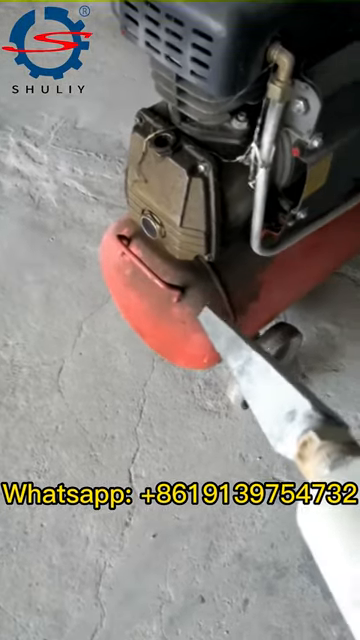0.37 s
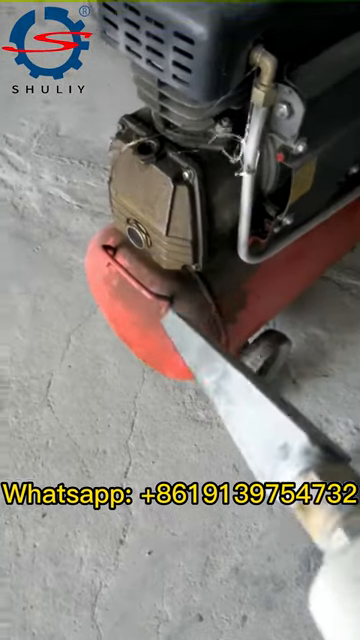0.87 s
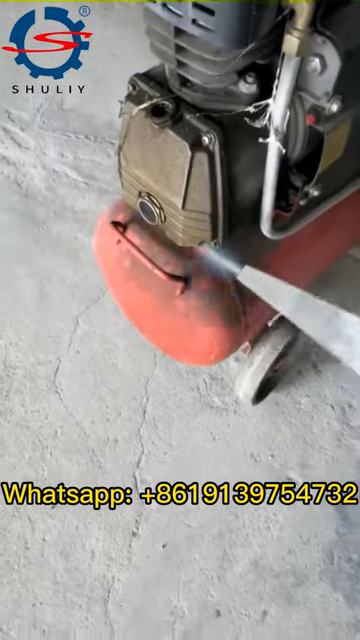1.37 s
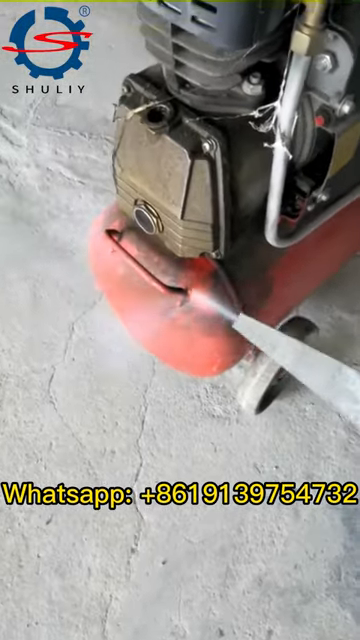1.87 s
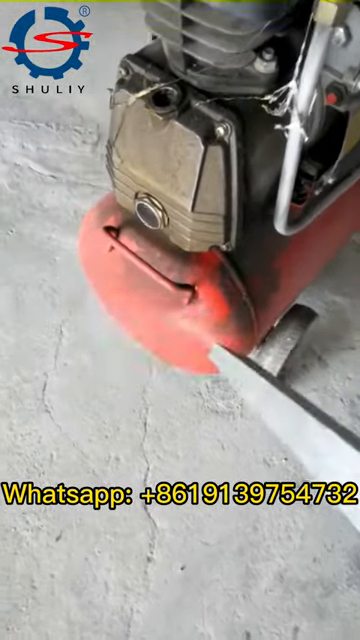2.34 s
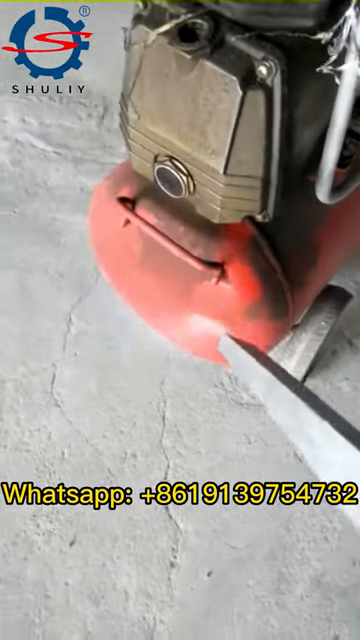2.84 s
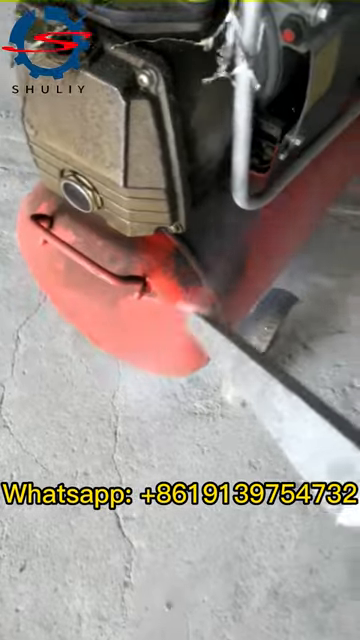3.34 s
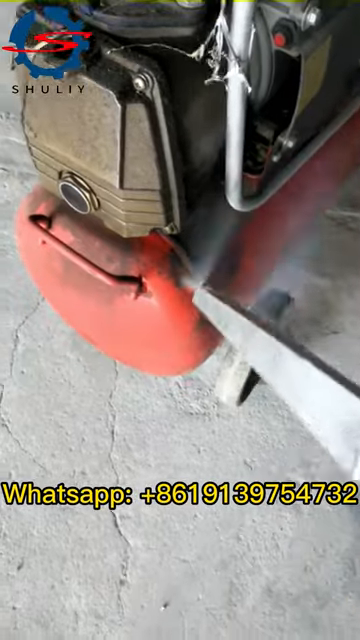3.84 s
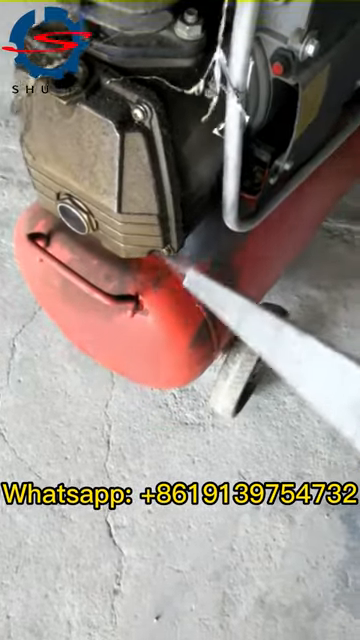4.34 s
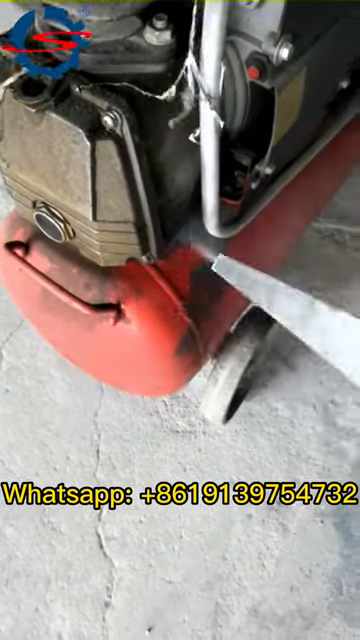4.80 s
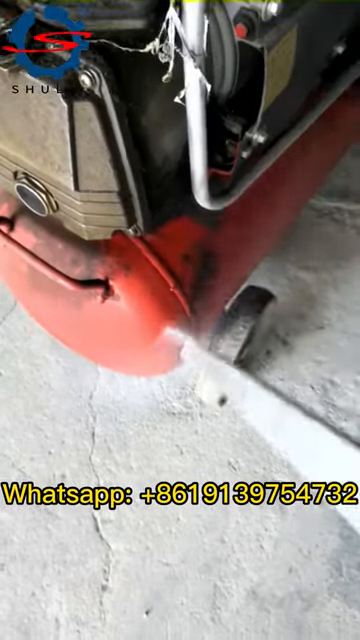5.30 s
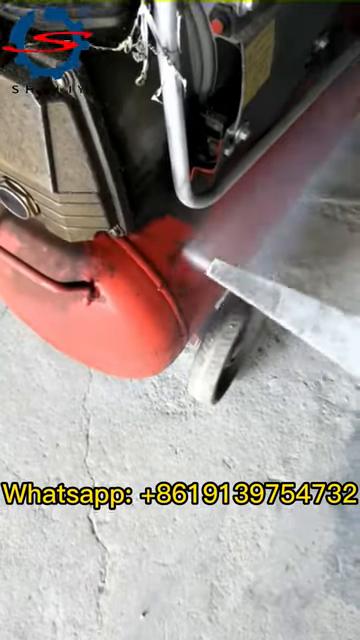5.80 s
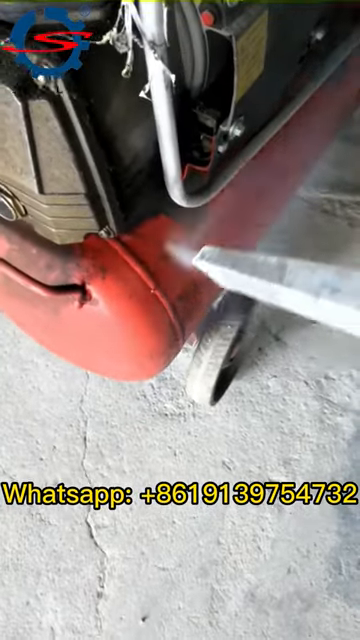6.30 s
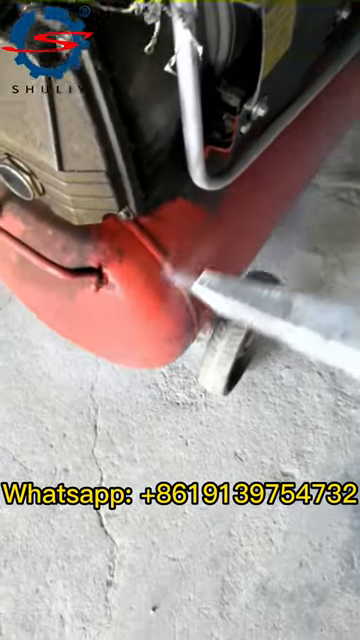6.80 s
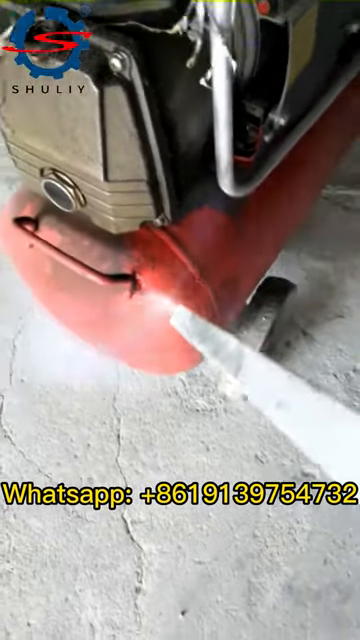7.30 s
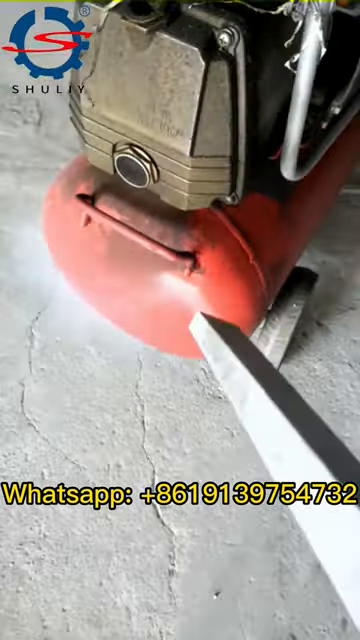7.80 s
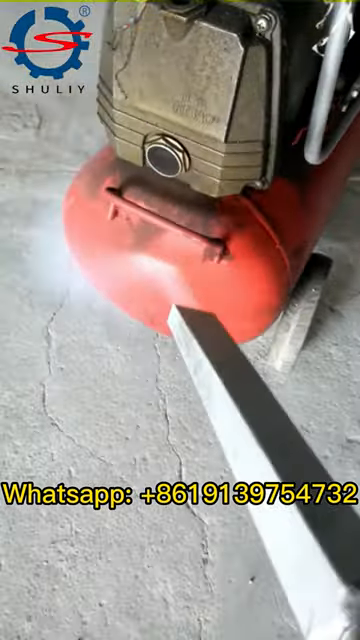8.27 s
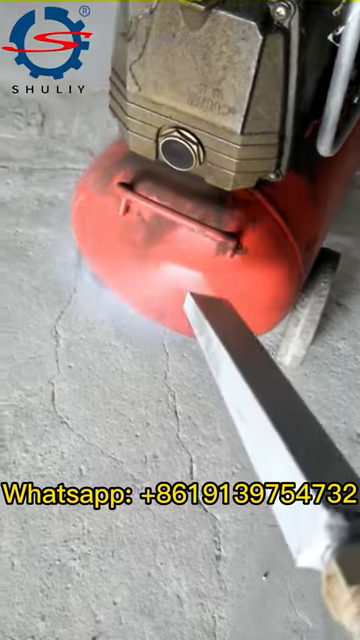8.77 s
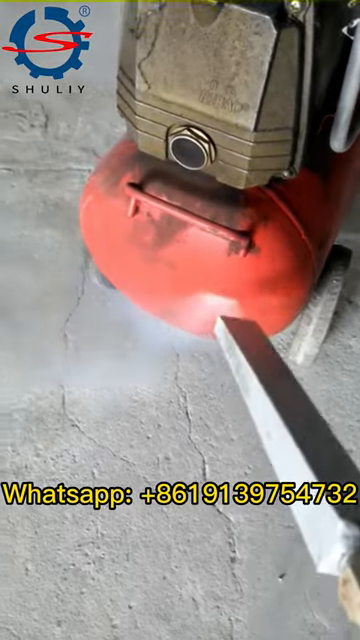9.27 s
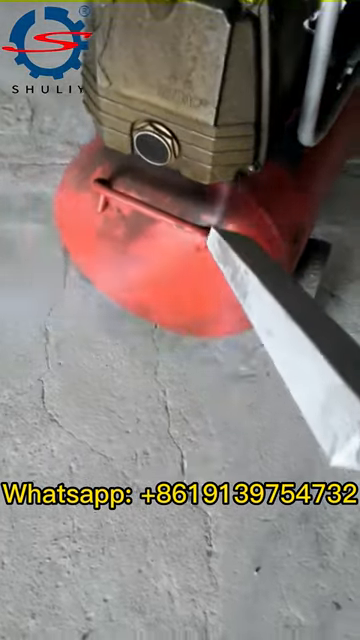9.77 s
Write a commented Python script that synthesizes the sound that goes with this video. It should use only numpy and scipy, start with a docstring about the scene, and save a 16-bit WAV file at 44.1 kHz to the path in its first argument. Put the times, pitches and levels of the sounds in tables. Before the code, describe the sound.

For the first 0.8 seconds a workshop is quiet: low room noise, faint machine drones and a thin, slightly wavering compressor whine, with small dry double ticks of hard parts at about 0.2, 0.35, 0.5 and 0.7. A soft mid-pitched hum swells from 0.65. At 0.78 the gun's trigger clicks sharply; around 0.81 a thin high whistle of air escapes, followed by low thumps, short spits and a hard valve knock at 0.85. By 0.9 the jet surges to full force and stays loud to the end near 10 seconds. It is a dense airy roar with bright, gritty ice hiss on steel and a weak buffeting rumble. From 1 to 2.9 it has a focused, ringing nozzle tone; later it is broader, its colour shifting with each sweep. The hiss dips briefly around 2.5, 6.6, 7.25 and several times from 7.6 to 8.8. Close, mono perspective.

```python
"""A quiet workshop, a mono microphone standing near: a compressor whines under room noise, hard parts tick.
A blast gun's trigger clicks as damped ringing modes; the valve thumps in low swings and spits bursts of noise.
Then a jet of air and dry ice roars against a steel tank: shaped noise for the roar, the hiss and the rumble,
with humps that move as the nozzle sweeps about."""
import sys
import numpy as np
from scipy import signal
from scipy.fft import rfft, irfft
from scipy.io import wavfile
from scipy.ndimage import uniform_filter1d

SR = 44100
rng = np.random.default_rng(int(sys.argv[2]) if len(sys.argv) > 2 else 0)


def natural_amplitude(level_db):
    """Convert a level in decibels to a linear amplitude factor, elementwise."""
    exponent = np.asarray(level_db, float) / 20
    return 10 ** exponent


def transcribe(u):
    """Save the signal u as a 16-bit wav file named by the first command-line argument.

    u: samples, shape (n,) or (channels, n), limited to [-1, 1]; the rate is SR.
    q: integer samples, one column per channel.
    """
    v = np.clip(np.atleast_2d(u).T, -1, 1)
    q = np.round(v * 32767).astype(np.int16)
    wavfile.write(sys.argv[1], SR, q)


N = 436149  # length in samples

# Room noise of the workshop. Each row: frequency in Hz, relative density in dB per Hz.
ROOM_SPECTRUM = [(12, -28), (20, -6), (53, 1), (308, -10), (398, -23), (602, -27), (1090, -24),
                 (1480, -23.5), (2180, -19), (3130, -27), (6970, -20), (8140, -28), (9500, -62),
                 (12400, -95), (20900, -120)]
# The idle workshop over time. Each row: time in seconds, room noise in dB, compressor whine in dB.
IDLE_LEVELS = [(0.0, -52, -75), (0.244, -51, -68), (0.52, -50, -64.5), (0.77, -49.5, -67)]
# Shaft orders of the compressor. Each row: multiple of the shaft rate, level relative to the whine in dB.
SHAFT_ORDERS = [(7, -8), (11, -27), (12, 0.5), (14, 8), (15, -5), (17, -14)]
# Low tones of the machines. Each row: frequency in Hz, rms level in dB, waver in dB.
MACHINE_DRONES = [(100, -65, 8), (148, -64, 9), (255, -65, 1), (305.2, -62, 1.5)]
# Ticks of small hard parts. Each row: start in seconds, peak of the first knock in dB, pitch in Hz,
# weight of the lower modes in dB, weight of the upper modes in dB.
TICK_EVENTS = [(.2109, -39, 2900, -5, -7), (.3631, -37.5, 2750, -5, -5), (.5292, -37, 2750, -9, -3),
               (.6898, -41, 2350, -10, 1), (.718, -45, 2750, -6, -6)]
# Modes of a ticking part. Each row: factor on the pitch, relative level in dB, 60 dB decay in seconds.
TICK_MODES = [(.62, -3, 0.017), (.71, 0, 0.017), (.82, -6, 0.011), (.95, 2, 0.016), (1.05, -7, .014),
              (1.2, -6, .01), (1.4, -16, .01), (1.75, -8, .008), (2.2, -6, 0.0073), (2.8, -5, 0.0088),
              (3.2, -15, .008)]
# The trigger strikes, then catches. Each row: start in seconds, peak in dB.
TRIGGER_CLICKS = [(.7818, -21.5), (.7831, -27)]
# Modes of the trigger. Each row: frequency in Hz, relative level in dB, 60 dB decay in seconds.
TRIGGER_MODES = [(1650, -6, 0.0081), (1970, -5, .009), (2450, -3, .007), (2750, -5, .006),
                 (3100, -11, .006), (3450, -15, .006), (4200, -19, .006), (5600, -12, .005),
                 (6050, -9, .006), (7350, -8, .006), (8100, -8, .006)]
# Modes of the valve slamming open. Each row: frequency in Hz, relative level in dB, 60 dB decay in seconds.
VALVE_MODES = [(1500, -5, .012), (2300, -2, .014), (2900, -5, .012), (4300, -6, .012), (4950, 0, .016),
               (6300, -6, .01), (7300, -5, .01)]
# Pressure surges in the hose. Each row: start in seconds, envelope peak in dB, frequency in Hz,
# rise in seconds, 60 dB decay in seconds.
HOSE_SURGES = [(0.8175, -13, 140, .004, 0.027), (0.8246, -9, 239, 0.0012, 0.016),
               (.830, -26, 246, 0.0044, 0.041), (.843, -22, 250, 0.0021, 0.021)]
# Bursts of air as the valve opens. Each row: start in seconds, level in dB before rise and decay,
# rise in seconds, 60 dB decay in seconds, brightness as hiss over roar in dB.
VALVE_SPITS = [(0.81, -42, .0005, 0.1, -6), (.817, -23, 0.0063, 0.079, 1), (.8365, -21, 0.0015, 0.025, 8),
               (0.847, -16, .001, .015, 0), (0.849, -15, 0.0009, 0.016, -1), (.865, -49, .002, 0.065, 10)]
# The nozzle sweeps. Each row: time in seconds, air roar in dB and ice hiss in dB before surges and lapses,
# hiss centre in Hz, focus in dB (high focus lifts the nozzle ring and lowers the body of the roar).
NOZZLE_SWEEPS = [(0.885, -23, -22, 7500, -1), (0.925, -19.5, -22, 6560, -3), (0.98, -19, -21.5, 5550, 5),
                 (1.3, -19.5, -22.5, 5670, 6), (1.9, -19, -22, 5260, 11), (2.3, -20, -18.5, 5900, 9),
                 (2.47, -20, -18.5, 5960, 2), (2.7, -19.5, -18, 5760, 12), (2.95, -20.5, -19, 6640, 4),
                 (3.4, -19.5, -19, 6760, -2.5), (4.05, -21.5, -20, 6850, 0), (4.15, -19.5, -18.5, 6600, 2),
                 (4.5, -20, -19, 6740, 0), (4.8, -21.5, -18.5, 6500, -1), (4.95, -18.5, -18, 6230, 7),
                 (5.2, -22, -19, 6000, -1), (5.3, -20.5, -19.5, 6840, -3), (5.55, -21.5, -20, 7000, 1),
                 (5.7, -21, -19.5, 5800, 1), (5.85, -22, -19, 5900, 2), (6.0, -20.5, -18.5, 5700, 0),
                 (6.22, -21.5, -18, 5900, -3), (6.45, -21.5, -18.5, 5900, -4), (6.65, -19, -17, 5700, -1),
                 (6.78, -21, -19, 5900, -3), (6.93, -20.5, -17, 5600, 3), (7.03, -21, -20, 5940, 1),
                 (7.15, -21.5, -19, 7200, 5), (7.45, -20.5, -17.5, 6740, -3), (7.8, -18, -19, 6500, 3),
                 (7.95, -22, -18, 5730, 3.5), (8.3, -20, -19.5, 5470, 12), (8.65, -21.5, -18, 5640, 6.5),
                 (9.0, -21.5, -20, 5740, 1.5), (9.2, -21.5, -20, 5670, 4.5), (9.6, -22.5, -19, 6140, 3),
                 (9.75, -19.5, -20.5, 7240, -9), (9.89, -22, -22, 6600, -7)]
# The ice feed falters. Each row: middle in seconds, half length in seconds, hiss change in dB, roar change in dB.
ICE_LAPSES = [(2.48, 0.14, -4.5, 1.5), (3.627, 0.066, -1.5, -0.5), (6.14, 0.044, -2.5, 0),
              (6.6, 0.042, -3, -1.5), (7.253, 0.071, -5.5, -1), (7.655, 0.063, -3.5, -3.5),
              (7.77, 0.07, -3, -1.5), (8.11, 0.1, -3, -1), (8.44, 0.13, -4.5, -0.5), (8.778, 0.13, -4, 0),
              (9.287, 0.057, 0, -3.5)]
# Turbulent air. Each row: frequency in Hz, relative density in dB per Hz.
ROAR_SPECTRUM = [(260, -32), (450, -36), (645, -11.5), (900, -6), (1250, -4.5), (1600, -1.5), (1900, 0),
                 (2300, -1.5), (2700, 0), (3000, -3.5), (3500, -6), (4090, -11.5), (4600, -14), (5980, -17)]
# Ice shattering on steel. Each row: frequency in Hz, relative density in dB per Hz.
HISS_SPECTRUM = [(2240, -19), (3800, 2), (4160, -0.5), (4810, 7.5), (5300, 4), (5750, 5), (6300, 2.5),
                 (7000, 4.5), (7700, 5.5), (8300, -0.5), (9000, -7.5)]
# Faint top of the ice hiss. Each row: frequency in Hz, relative density in dB per Hz.
HISS_TOP_SPECTRUM = [(9600, -13), (10500, -17), (12000, -24), (16000, -40)]
# Air buffeting. Each row: frequency in Hz, relative density in dB per Hz.
RUMBLE_SPECTRUM = [(12, -27), (20, 0), (54, -1), (117, 0), (536, -12), (700, -16), (910, -25), (1540, -120)]

OPEN_S = 0.904  # the pressure has climbed by now


def read(points, hz):
    """Reads a (Hz, value) table on a log axis."""
    f, value = np.transpose(points)
    return np.interp(np.log(hz + 1), np.log(f + 1), value)


def evened(x):
    """Scales to rms 1."""
    return x / np.sqrt(np.mean(x ** 2) + 1e-20)


def add(mix, s, sound):
    """Mixes a sound in at time s."""
    part = mix[round(s * SR):][:len(sound)]
    part += sound[:len(part)]


def curves(rows):
    """Table columns at the sample rate."""
    s, *columns = np.transpose(rows)
    return [np.interp(np.arange(N) / SR, s, c) for c in columns]


def drift(seconds):
    """Slow random wander of rms 1."""
    size = round(seconds * SR)
    return evened(uniform_filter1d(uniform_filter1d(rng.standard_normal(N), size), size))


def low_noise(spectrum):
    """Steady noise of rms 1 with fine resolution in the bass."""
    hz = np.fft.rfftfreq(N, 1 / SR)
    return evened(irfft(rfft(rng.standard_normal(N)) * natural_amplitude(read(spectrum, hz)), N))


def noise(spectrum, humps, patchy_db, ripple_db, flicker_db):
    """Random short-time spectra of rms 1, with moving humps (Hz, dB, octaves), patches, ripple and flicker."""
    frames, hz = N // 256 + 5, np.fft.rfftfreq(1024, 1 / SR)[:, None]
    real, imag, patches, ripple = rng.standard_normal((frames, 513, 4)).T
    patches = evened(uniform_filter1d(uniform_filter1d(patches, size=12, axis=0), size=12, axis=1))
    # echoes from floor and walls: narrow ripples that drift as the nozzle moves
    ripple = evened(uniform_filter1d(uniform_filter1d(ripple, size=2, axis=0), size=30, axis=1))
    flicker = evened(uniform_filter1d(rng.standard_normal(frames), size=3))
    at = np.minimum(np.arange(frames) * 256, N - 1)
    db = read(spectrum, hz)
    for centre_hz, bump_db, octaves in humps:
        distance = np.log2((hz + 1) / (centre_hz * np.ones(N))[at])
        db = db + (bump_db * np.ones(N))[at] * np.exp(-.5 * (distance / octaves) ** 2)
    gain = natural_amplitude(db)
    gain = gain / np.linalg.norm(gain, axis=0)  # equal power in every frame
    gain = gain * natural_amplitude(patchy_db * patches + ripple_db * ripple + flicker_db * flicker)
    return evened(signal.istft((real + 1j * imag) * gain, nperseg=1024, noverlap=768)[1][:N])


def knock(modes):
    """Hard parts meeting: quickly damped modes (Hz, dB, t60 s) with a dry crack of first contact, peak 1."""
    snap_db, snap_t60_s = -11, 0.0048  # crack relative to the ring, before the onset
    t = np.arange(2000) / SR
    ring = sum(natural_amplitude(db - 60 * t / t60) * np.sin(2 * np.pi * (hz * t + rng.random())) for hz, db, t60 in modes)
    crack = np.diff(rng.standard_normal(len(t) + 1)) / 2
    ring = ring + natural_amplitude(snap_db - 60 * t / snap_t60_s) * abs(ring).max() * crack
    ring = ring * (1 - np.exp(-t / 0.00048))  # soft onset
    return ring / abs(ring).max()


def workshop():
    """Room noise, far drones and the slightly wavering shaft orders of a compressor."""
    shaft_hz, waver_db = 152.6, 1
    room_db, whine_db = curves(IDLE_LEVELS)
    wander = evened(uniform_filter1d(rng.standard_normal(N), size=4000))
    turns = np.cumsum(shaft_hz * (1 + 0.00021 * wander)) / SR
    whine, drone = np.zeros(N), np.zeros(N)
    for order, db in SHAFT_ORDERS:
        tone = np.sin(2 * np.pi * (round(order) * turns + rng.random()))
        whine += natural_amplitude(db + waver_db * drift(0.06)) * tone
    for hz, db, drone_waver_db in MACHINE_DRONES:
        tone = np.sin(2 * np.pi * hz * turns / shaft_hz)
        drone += natural_amplitude(db + drone_waver_db * drift(0.07)) * tone
    return natural_amplitude(room_db) * low_noise(ROOM_SPECTRUM) + np.sqrt(2) * (natural_amplitude(whine_db) * whine + drone)


def ticks():
    """Small hard parts knocking twice in quick succession, the second time softer."""
    out = np.zeros(N)
    for s, db, hz, low_db, high_db in TICK_EVENTS:
        modes = [(f * hz, g + low_db * (f < .9) + high_db * (f > 1.3), t60) for f, g, t60 in TICK_MODES]
        ring = natural_amplitude(db) * knock(modes)
        add(out, s, ring)
        add(out, s + 0.001345, 0.62 * ring)
    return out


def hum():
    """Soft tone just before the trigger: a sine that fades in, swells a little and dies away."""
    start_s, rise_s, end_s, fall_s = 0.636, 0.045, 0.78, 0.035
    hz, start_db, swell_db_per_s = 595, -56, 40
    t = np.arange(N) / SR
    fade = np.clip((t - start_s) / rise_s, 0, 1) ** 2 * np.clip(1 - (t - end_s) / fall_s, 0, 1)
    level_db = start_db + swell_db_per_s * np.clip(t - start_s, 0, end_s - start_s)
    return fade * np.sqrt(2) * natural_amplitude(level_db) * np.sin(2 * np.pi * hz * t)


def trigger():
    """The gun's trigger strikes and catches, each a knock of damped modes."""
    out = np.zeros(N)
    for s, db in TRIGGER_CLICKS:
        add(out, s, natural_amplitude(db) * knock(TRIGGER_MODES))
    return out


def seep():
    """Thin whistle as the valve first cracks open: a narrow band of noise that starts at once and fades."""
    start_s, level_db, t60_s = .8088, -21.5, 0.08
    centre_hz, width_hz = 7600, 780
    out, t = np.zeros(N), np.arange(SR // 10) / SR
    band = np.exp(-.5 * ((np.fft.rfftfreq(len(t), 1 / SR) - centre_hz) / width_hz) ** 2)
    air = evened(irfft(rfft(rng.standard_normal(len(t))) * band, len(t)))
    add(out, start_s, np.minimum(t / .0006, 1) * natural_amplitude(level_db - 60 * t / t60_s) * air)
    return out


def valve():
    """The valve slams open as a knock, amid low swings of hose pressure that build over a cycle and die."""
    out, t = np.zeros(N), np.arange(SR // 5) / SR
    for s, db, hz, rise, t60 in HOSE_SURGES:
        swing = (1 - np.exp(-t / rise)) ** 2 * natural_amplitude(-60 * np.maximum(t - rise, 0) / t60)
        add(out, s, natural_amplitude(db) * swing / swing.max() * np.sin(2 * np.pi * hz * t))
    add(out, .8495, natural_amplitude(-10) * knock(VALVE_MODES))
    return out


def add_spits(roar_gain, hiss_gain):
    """Bursts of air as the valve opens raise both gains; brightness tilts them from roar to hiss."""
    t = np.arange(SR // 5) / SR
    for s, db, rise, t60, bright_db in VALVE_SPITS:
        puff = np.minimum(t / max(rise, 1e-4), 1) * natural_amplitude(db - 60 * t / t60)
        add(roar_gain, s, puff * natural_amplitude(-bright_db / 2))
        add(hiss_gain, s, puff * natural_amplitude(bright_db / 2))


def roar_humps(clock, focus_db, body_db, gap):
    """Humps (Hz, dB, octaves) of the air roar: body, nozzle ring with its narrow peak, and a low hollow."""
    wander_db = 0.4
    body = (1440, body_db + wander_db * drift(0.03), 0.31)
    ring = (2520, 0.37 * focus_db + wander_db * drift(0.029), 0.24)
    edge = (2800 + 60 * drift(0.14), 0.15 * np.maximum(focus_db, 0), 0.034)
    # the low roar fills in late
    hollow = (620, -7 * np.exp(-np.maximum(clock - OPEN_S, 0) / 0.95), 0.23)
    return [gap, body, ring, edge, hollow]


def blast():
    """Roar, hiss and rumble of the jet, led by the first spits; the humps move with the nozzle."""
    roar_db, hiss_db, hiss_hz, focus_db = curves(NOZZLE_SWEEPS)
    clock = np.arange(N) / SR
    body_db = -0.036 * focus_db
    for s, half, hiss_change_db, roar_change_db in ICE_LAPSES:
        lapse = np.exp(-((clock - s) / half) ** 4)
        hiss_db, roar_db = hiss_db + hiss_change_db * lapse, roar_db + roar_change_db * lapse
        body_db = body_db + 0.39 * hiss_change_db * lapse

    # pressure climbs at 290 dB per second, then overshoots once
    climb_db = 290 * np.minimum(clock - OPEN_S, 0)
    surge_db = 3 * np.exp(-((clock - .954) / .01) ** 2)
    # 0 before the jet, 1 from the last spit on
    flowing = np.clip((clock - VALVE_SPITS[-1][0]) / .004 + 1, 0, 1)
    # the gap between roar and hiss fills as ice arrives
    unfilled = (1 - np.tanh((clock - 0.93) / .012)) / 2
    gap = (3800, -6 * flowing * unfilled, 0.21)

    roar = noise(ROAR_SPECTRUM, roar_humps(clock, focus_db, body_db, gap),
                 patchy_db=-0.58, ripple_db=1.5, flicker_db=1.07)
    spit_hz, hump_db = 7300, 4  # the hiss hump sits at spit_hz until the jet flows
    hump = (spit_hz + flowing * (hiss_hz - spit_hz), hump_db, .17)
    hiss = noise(HISS_SPECTRUM + HISS_TOP_SPECTRUM, [hump, gap], patchy_db=1.0, ripple_db=2.0, flicker_db=0.8)

    roar_gain = natural_amplitude(roar_db + climb_db + surge_db)
    # the ice arrives 4.4 ms after the air
    ice_climb_db = np.interp(clock - 0.0044, clock, climb_db)
    hiss_gain = natural_amplitude(hiss_db + ice_climb_db + surge_db + 0.29 * drift(0.037))
    add_spits(roar_gain, hiss_gain)

    # the rumble follows about half of the climb, in gusts
    rumble_db = -29 + 0.52 * climb_db + 1 * drift(0.046)
    rumble = flowing * natural_amplitude(rumble_db) * low_noise(RUMBLE_SPECTRUM)
    return roar_gain * roar + hiss_gain * hiss + rumble


def dropouts(x):
    """Narrow slices of the hollow above the rumble drop out for an instant."""
    low_hz, high_hz, share, drop_db = 330, 900, .05, -30
    hz, t, z = signal.stft(x, SR, nperseg=1024, noverlap=768)
    # each cell spans 4 frequency bins and 6 frames
    cells = rng.random((len(t) // 6 + 1, len(hz) // 4 + 1)).T < share
    cells = np.repeat(np.repeat(cells, 4, axis=0), 6, axis=1)[:len(hz), :len(t)]
    inside = ((hz > low_hz) & (hz < high_hz))[:, None] & (t > OPEN_S)
    return signal.istft(z * natural_amplitude(drop_db * cells * inside), SR, nperseg=1024, noverlap=768)[1][:N]


def scene():
    """All sources reach one microphone, laid on two equal channels."""
    background = workshop() + ticks() + hum()
    gun = trigger() + seep() + valve()
    return np.tile(background + gun + dropouts(blast()), (2, 1))


def roll_off(x):
    """The treble ends steeply here."""
    return signal.sosfilt(signal.butter(12, 11800, fs=SR, output="sos"), x)


def record(dry):
    """The finished mix as it is kept."""
    return roll_off(dry)


dry = scene()
out = record(dry)
transcribe(out)
```